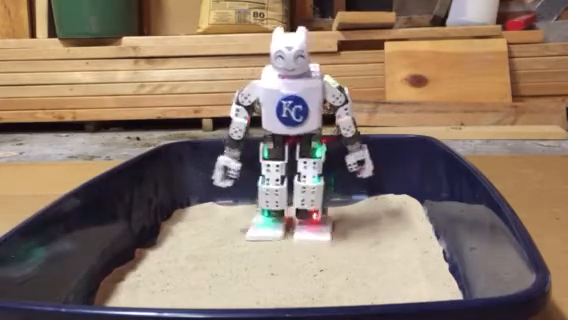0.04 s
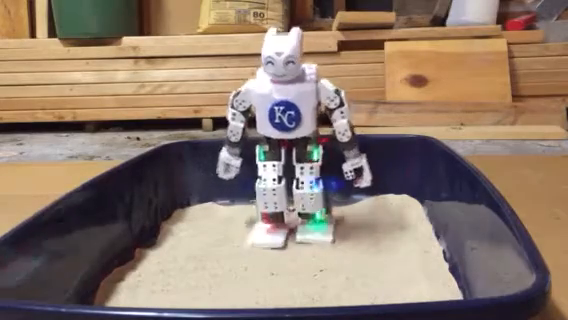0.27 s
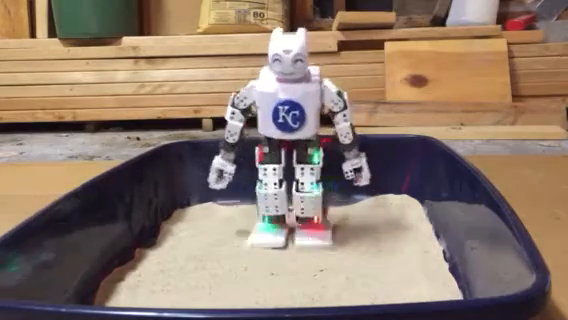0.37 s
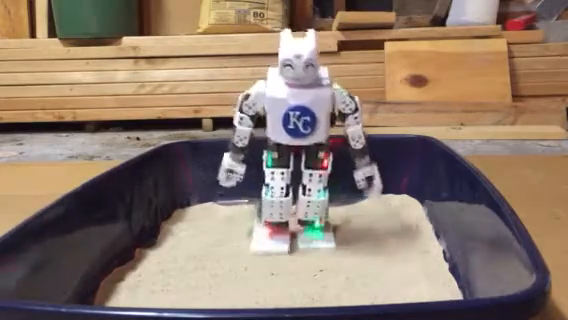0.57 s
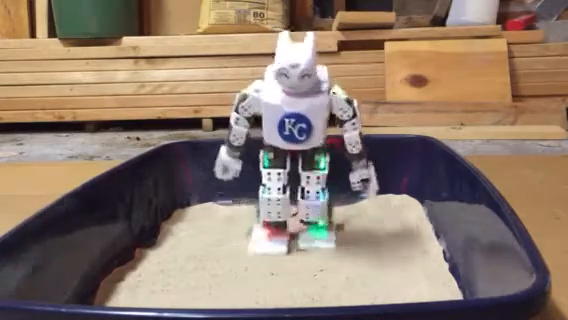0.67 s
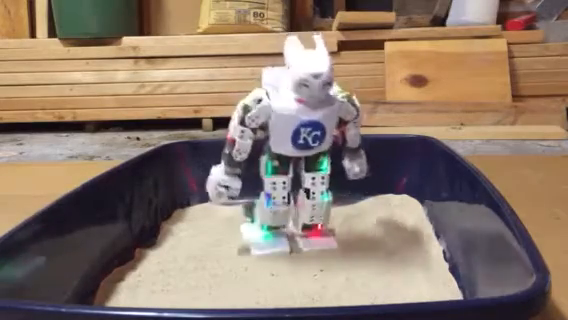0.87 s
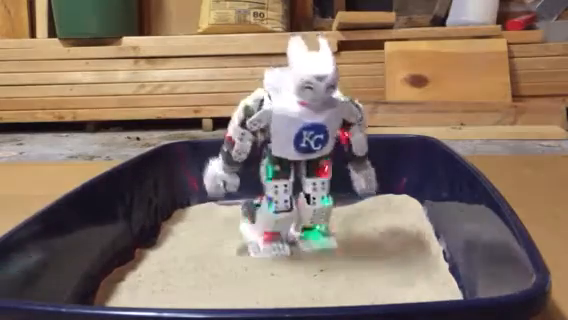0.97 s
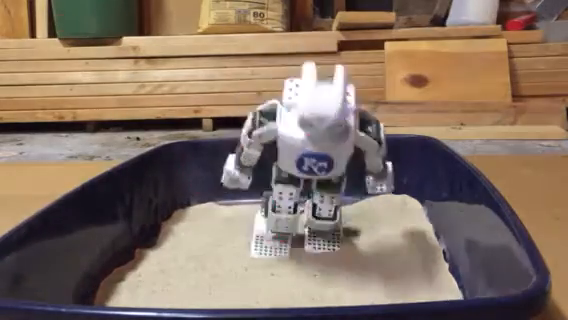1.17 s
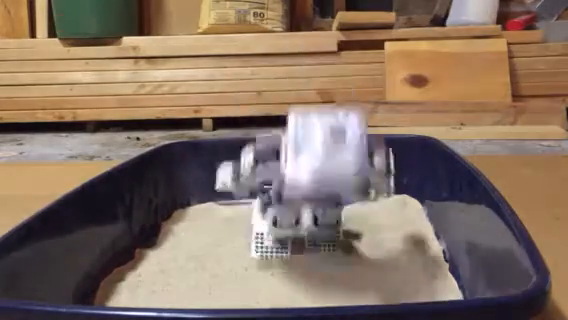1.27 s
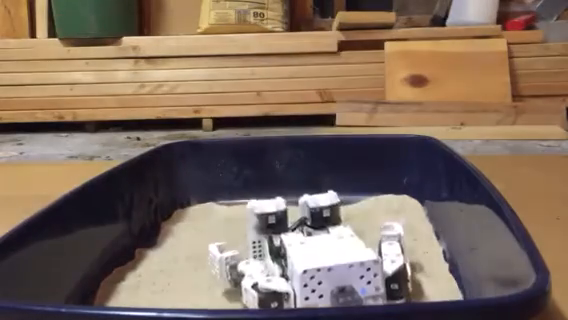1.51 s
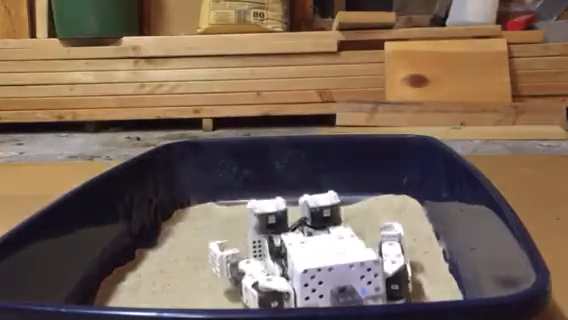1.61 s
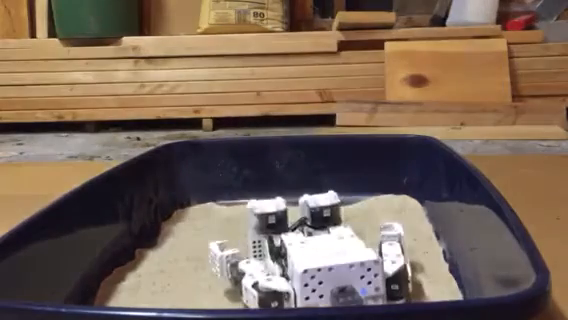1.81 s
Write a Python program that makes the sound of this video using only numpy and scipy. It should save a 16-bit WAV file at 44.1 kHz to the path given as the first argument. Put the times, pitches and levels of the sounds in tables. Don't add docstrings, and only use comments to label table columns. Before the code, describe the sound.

Whining, hissing little robot motors step through gritty sand before the plastic body slams down flat

```python
import sys
import numpy as np
from scipy import signal
from scipy.fft import rfft, irfft, next_fast_len
from scipy.io import wavfile
from scipy.ndimage import map_coordinates

SR = 44100
rng = np.random.default_rng(int(sys.argv[2]) if len(sys.argv) > 2 else 0)


def put_to_file(sound):
    columns = np.atleast_2d(sound).T
    safe = np.clip(columns, -1, 1)
    whole_steps = np.round(safe * 32767)
    wavfile.write(sys.argv[1], SR, whole_steps.astype(np.int16))


def undo_db(level):
    steps = np.asarray(level, float) / 20
    return 10 ** steps


N = 81585

# f/Hz, level/dB
CASE_COLOUR = [(1500, -33.5), (3700, -12.5), (4400, -18.5), (5500, -2.5), (8800, -2), (11500, -9),
               (14000, -6.5), (17000, -40)]
# t/s, level/dB, clatter share [1], hardness as pitch ratio [1]
CONTACTS = [
    (1.5416, -9.5, 0.085, 2.74),
    (1.5428, -8, 0.11, 1.1),
    (1.5458, -22, 0.18, 0.69),
    (1.548, -32.5, 3.5, 1.5),
]
FALL_S = CONTACTS[0][0]


def unit(x):
    return x / np.sqrt(np.mean(x ** 2) + 1e-20)


def along(points, hz):
    f, v = np.transpose(points)
    return np.interp(np.log(hz + 1), np.log(f + 1), v)


def wobble(rate_hz, size=N):
    knots = rng.standard_normal(int(size * rate_hz / SR) + 4)
    return map_coordinates(knots, [np.arange(size) * rate_hz / SR])


def noise(size=N):
    return rng.standard_normal(size)


def coloured(x, spectrum):
    m = next_fast_len(len(x) + 8192)
    gain = undo_db(along(spectrum, np.fft.rfftfreq(m, 1 / SR)))
    return unit(irfft(rfft(x, m) * gain, m)[:len(x)])


def highpass(x, hz):
    return signal.sosfilt(signal.butter(2, hz, "high", fs=SR, output="sos"), x)


def add(track, s, sound):
    part = track[max(round(s * SR), 0):][:len(sound)]
    part += sound[:len(part)]


def ring(modes, t, attack_s):
    tones = sum(undo_db(db - 60 * t / t60) * np.sin(2 * np.pi * hz * t) for hz, db, t60 in modes)
    return tones * (1 - np.exp(-t / attack_s))


def case_db(hz):
    # f/Hz, width/Hz, lift/dB
    peaks = [(3650, 280, 3.5), (4700, 240, 8), (6060, 1700, 3), (7010, 190, 5), (8690, 330, 7),
             (11480, 590, 8)]
    lift_db = sum(db / (1 + (2 * (hz - c) / w) ** 2) for c, w, db in peaks)
    return along(CASE_COLOUR, hz) + lift_db - 2.5


def servos():
    # fastest moment t/s, top tooth rate f/Hz, whine level/dB, hiss level/dB, gear turn then [0-1]
    strokes = [(-.03, 1920, -62, -52, 0.3), (0.065, 2050, -48, -67, 0), (0.072, 2350, -38, -43, 0.6),
               (.143, 2083, -42.5, -43, 0.26), (0.261, 1587, -45, -46, 0.28), (0.271, 2300, -49, -49, 0.97),
               (0.341, 2080, -40.5, -43.5, 0.05), (0.462, 2056, -50.5, -60, 0.33),
               (0.462, 2323, -37, -44.5, 0.39), (0.537, 2258, -40, -43, 0), (0.651, 2167, -44.5, -49.5, 0),
               (.662, 2333, -48, -45, 0.1), (0.734, 2036, -43.5, -50.5, 0), (0.734, 2243, -51, -43.5, 0.6),
               (0.854, 2274, -36.5, -44, 0), (0.932, 2110, -41, -42.5, 0.28),
               (1.052, 2433, -43.5, -50.5, 0.22), (1.052, 1727, -51, -45, 0.5),
               (1.134, 1893, -39, -42, 0.37), (1.238, 1584, -49, -54, 0.3), (1.25, 2282, -38, -41.5, 0),
               (1.331, 2128, -41.5, -49.5, 0.08)]
    # t/s, level/dB
    starts = [
        (0.024, -38.5),
        (0.227, -36),
        (0.42, -42),
        (0.619, -41.5),
        (.822, -49),
        (1.018, -42),
        (1.201, -37.5),
        (1.303, -34),
    ]
    # f/Hz, density/dB
    hiss_colour = [(1000, -53.5), (2000, -14.5), (3200, -8), (4700, -7), (5500, 1), (8800, -1),
                   (14800, -6.5), (15800, -3)]
    stroke_s, hiss_stretch, teeth = .088, 1.21, 30.4
    whine_power, hiss_power = 5, 1.59
    slowing, travel_hz, travel_power = 1.2, 2277, 1.3
    beat_db, flicker_db, flicker_hz = 4.5, 4.5, 110
    jitter, jitter_hz, tooth_gate = .008, 400, .5
    start_rise_s, start_t60_s = .0055, .078
    hold_db, hold_lumps_db, hold_end_s = -55, 1.8, 1.375
    dome_hz, dome_power, dome_db = 9500, .3, -44

    lead = SR // 5
    whine, hiss_power_sum = np.zeros(N + lead), np.zeros(N + lead)
    t = np.arange(-SR // 11, SR // 11) / SR
    size = len(t)
    for s, top_hz, whine_db, hiss_db, turn in strokes:
        longer = slowing * min((travel_hz / top_hz) ** travel_power, 1.3)
        stretch = np.where(t > 0, longer, 1)

        def arch(length_s):
            return np.cos(np.pi * np.clip(t / length_s / stretch, -.5, .5)) + 1e-6

        speed = arch(stroke_s)
        hz = top_hz * speed * (1 + jitter * wobble(jitter_hz, size))
        phase = 2 * np.pi * np.cumsum(hz) / SR
        beat = beat_db * np.cos((phase - phase[size // 2]) / teeth + 2 * np.pi * turn)
        stack = np.zeros(size)
        for k in range(2, 11):
            level_db = case_db(k * hz) + beat + flicker_db * wobble(flicker_hz, size)
            audible = k * hz < SR * .45
            stack += undo_db(level_db) * audible * np.sin(k * phase + rng.uniform(0, 7.8))
        start_s = s + t[0] + lead / SR
        add(whine, start_s, undo_db(whine_db) * speed ** whine_power * stack)
        gate = 1 + tooth_gate * np.cos(phase)
        gate *= undo_db(hiss_db + 0.11 * beat + 1.8 * wobble(393.4, size))
        gate *= arch(stroke_s * hiss_stretch) ** hiss_power
        add(hiss_power_sum, start_s, gate ** 2)

    age = t - t[0]
    for s, db in starts:
        kick = undo_db(db - 60 * age / start_t60_s) * np.minimum(age / start_rise_s, 1)
        add(hiss_power_sum, s + lead / SR, kick ** 2)
    hold = undo_db(hold_db + hold_lumps_db * wobble(89)) * (np.arange(N) < hold_end_s * SR)
    level = np.sqrt(hiss_power_sum[lead:] + hold ** 2)

    hiss = coloured(noise(), hiss_colour)
    low = signal.sosfiltfilt(signal.butter(2, dome_hz, fs=SR, output="sos"), hiss)
    top = (level / undo_db(dome_db)) ** dome_power * (hiss - low)
    return whine[lead:] + level * (low + top)


def feet():
    # t/s, level/dB
    scrape = [(0, -61.5), (.07, -65), (0.142, -57), (.22, -73), (0.329, -57), (.42, -68.5), (0.533, -55.5),
              (.63, -76), (0.719, -54.5), (.8, -71), (0.907, -51), (1.0, -66), (1.098, -53.5), (1.19, -57),
              (1.27, -47), (1.38, -56), (1.47, -51.5), (1.532, -53.5)]
    # f/Hz, density/dB
    sand = [(350, -36.5), (720, -9), (1030, 1), (1180, -0.5), (1350, 1), (1800, -10.5), (2350, -8),
            (5000, -25)]
    grit_db, grit_hz = 2.2, 260
    s, db = np.transpose(scrape)
    level_db = np.interp(np.arange(N) / SR, np.append(s, s[-1] + 0.13), np.append(db, db[-1] - 24))
    grains = undo_db(grit_db * wobble(grit_hz) + grit_db * wobble(40.36)) * noise()
    return undo_db(level_db) * coloured(grains, sand)


def shell():
    # t/s, peak level/dB, shell f/Hz, snap level/dB
    knocks = [(.004, -42, 734, -71), (.022, -50, 950, -70), (.045, -48, 750, -70), (.065, -51, 850, -65),
              (0.325, -44.5, 1270, -46), (0.524, -56, 1070, -40), (.716, -50, 1300, -50),
              (0.725, -47, 1100, -40), (1.044, -53, 1350, -59), (1.064, -47, 1490, -60),
              (1.115, -42.5, 2390, -40), (1.206, -37, 1250, -34), (1.228, -45, 1460, -64),
              (1.256, -23, 1317, -35), (1.279, -31.5, 1425, -58), (1.3079, -33, 1317, -39.5),
              (1.39, -44, 1390, -66), (1.401, -52, 1220, -62), (1.422, -34, 1310, -42),
              (1.431, -55, 1170, -64.5), (1.447, -28, 1310, -41), (1.45, -38, 1066, -45.5),
              (1.456, -26.5, 1106, -37), (1.458, -31.5, 1056, -39), (1.466, -27, 1120, -31.5),
              (1.478, -38, 1043, -71), (1.616, -52, 1240, -40), (1.661, -31.5, 830, -40)]
    # frequency ratio [1], level/dB
    shell_modes = [(.55, -5), (.8, -2), (1, 3), (1.25, -7), (1.7, -11), (2.3, -11), (3.1, -13)]
    shell_t60_s, snap_t60_s, snap_top_hz = .016, .008, 8100
    out, t = np.zeros(N), np.arange(SR // 10) / SR
    b, a = signal.butter(1, snap_top_hz, fs=SR)
    for s, db, hz, snap_db in knocks:
        snap = undo_db(snap_db - 60 * t / snap_t60_s) * signal.lfilter(b, a, noise(len(t)))
        modes = [(hz * ratio, mode_db, shell_t60_s) for ratio, mode_db in shell_modes]
        add(out, s, undo_db(db) * ring(modes, t, attack_s=0.00099) + snap)
    return highpass(out, 430)


def landing():
    # f/Hz, level/dB, t60/s
    body = [(183, -8, 0.045), (250.4, -0.5, 0.036), (410, -9, 0.023), (500, -7, 0.015), (630, 8.5, 0.014),
            (775, -5.5, 0.018), (1032, -10, 0.021), (1440, -17, 0.02), (1700, -34, 0.037),
            (1876, -16, 0.026), (2274, -11, 0.032)]
    out, t = np.zeros(N), np.arange(SR // 2) / SR
    for s, db, clatter, ratio in CONTACTS:
        bright = coloured(noise(len(t)), CASE_COLOUR) * undo_db(-60 * t / 0.042)
        modes = [(hz * ratio, mode_db, t60 / ratio) for hz, mode_db, t60 in body]
        add(out, s, undo_db(db - 8) * (clatter * bright - ring(modes, t, attack_s=0.000383)))
    return highpass(out, 105)


def tub():
    # f/Hz, density/dB
    boom_colour = [(45, -24), (62, 14), (75, 12.5), (100, 11), (140, -1), (210, -9.5), (300, -10),
                   (600, -41.5)]
    # f/Hz, level/dB, t60/s
    tub_modes = [(61.4, 2.5, 0.34), (79.9, -2.5, 0.46), (97.8, 0.5, 0.48), (118.2, -6.5, 0.45),
                 (201.9, -12, 0.48)]
    boom_db, boom_t60_s, boom_rise_s = -37, 0.62, 0.0198
    tub_db, tub_lag_s, tub_rise_s = -31, .025, .007
    out, t = np.zeros(N), np.arange(SR // 2) / SR
    swell = undo_db(boom_db - 60 * t / boom_t60_s) * (1 - np.exp(-t / boom_rise_s))
    add(out, FALL_S, swell * coloured(noise(len(t)), boom_colour))
    add(out, FALL_S + tub_lag_s, undo_db(tub_db) * ring(tub_modes, t, attack_s=tub_rise_s))
    return out


def thrown_sand():
    # f/Hz, density/dB
    puff_colour = [(80, -26), (200, -6), (600, -3), (1200, -20), (2300, -15), (3000, -24), (9000, -43)]
    # f/Hz, density/dB
    spray_colour = [(90, -31.5), (200, -4), (600, -10), (1400, -10), (1900, -13.5), (2350, -11),
                    (3000, -18.5), (16000, -35.5)]
    puff_db, puff_t60_s = -28, 0.071
    spray_db, spray_t60_s, spray_lumps_db = -29, 0.29, 1
    out, t = np.zeros(N), np.arange(SR // 2) / SR
    size = len(t)
    add(out, FALL_S, undo_db(puff_db - 60 * t / puff_t60_s) * coloured(noise(size), puff_colour))
    spray = coloured(undo_db(3.2 * wobble(199.3, size)) * noise(size), spray_colour)
    level_db = spray_db - 60 * t / spray_t60_s + spray_lumps_db * wobble(50, size)
    add(out, FALL_S, undo_db(level_db) * spray)
    return out


def room(x):
    # f/Hz, t60/s
    room_t60 = [(150, 0.19), (1000, 0.27), (5000, 0.19), (14000, 0.057)]
    hz, t, z = signal.stft(noise(SR // 2), SR, nperseg=256)
    decay = undo_db(-60 * t / along(room_t60, hz)[:, None])
    tail = signal.istft(z * decay, SR, nperseg=256)[1]
    delayed = np.pad(x, (round(.006 * SR), 0))
    return signal.fftconvolve(delayed, tail / np.linalg.norm(tail))[:N]


def background():
    # f/Hz, density/dB
    rumble_colour = [(12, -74.5), (20, -50), (43, -6), (108, -0.5), (151, -8.5), (177, -10.5), (206, -22.5),
                     (316, -26), (500, -45), (650, -62), (1100, -120)]
    # f/Hz, density/dB
    air_colour = [(180, -41), (300, -17), (549, -13), (820, -17), (1960, -15.5), (15200, -27.5),
                  (16500, -30)]
    rumble_db, air_db = -58, -73.5
    rumble = undo_db(rumble_db + 0.18 * wobble(4.8)) * coloured(noise(), rumble_colour)
    return rumble + undo_db(air_db) * coloured(noise(), air_colour)


def scene():
    room_db = -14.5
    robot = servos() + feet() + shell() + landing() + tub() + thrown_sand()
    return (robot + undo_db(room_db) * room(robot) + background())[None]


def top_cut(x):
    return signal.sosfilt(signal.butter(12, 17030, fs=SR, output="sos"), x)


def record(dry):
    low_hz, top_hz, above_db = 48, 15950, -34
    duck_db, duck_s = -4, 0.73
    m = next_fast_len(N + SR // 4)
    f = np.fft.rfftfreq(m, 1 / SR)
    jf = 1j * f
    bass_cut = jf ** 2 / (jf ** 2 + np.sqrt(2) * jf * low_hz + low_hz ** 2)
    heard = irfft(rfft(dry, m) * bass_cut * undo_db(above_db * (f > top_hz)), m)[:, :N]
    after_s = np.arange(N) / SR - FALL_S - .01
    gain = undo_db(duck_db * (after_s > 0) * np.exp(-np.abs(after_s) / duck_s))
    return top_cut(heard * gain)


dry = scene()
out = record(dry)
put_to_file(out)
```